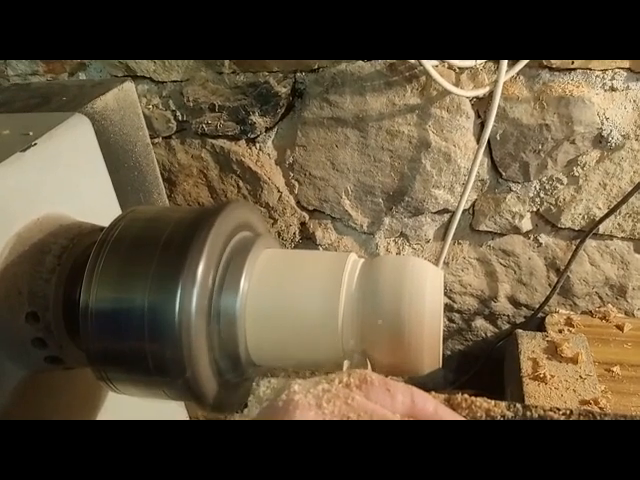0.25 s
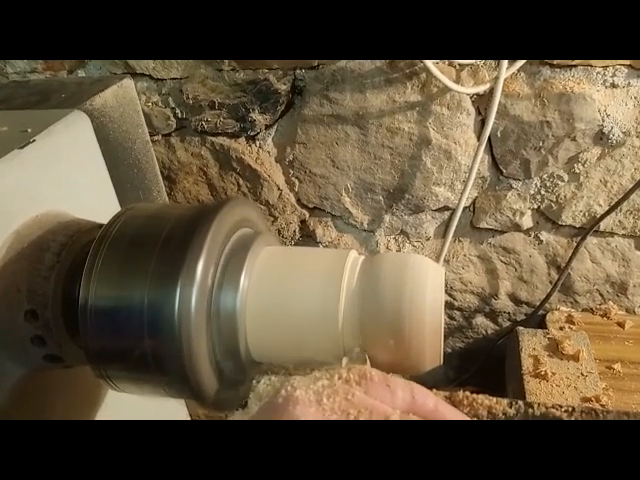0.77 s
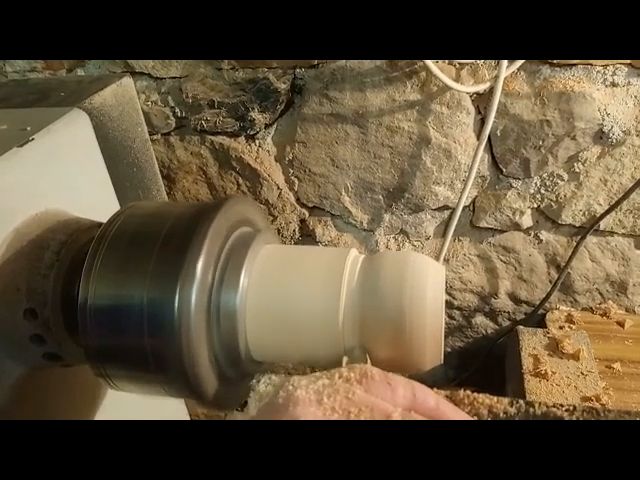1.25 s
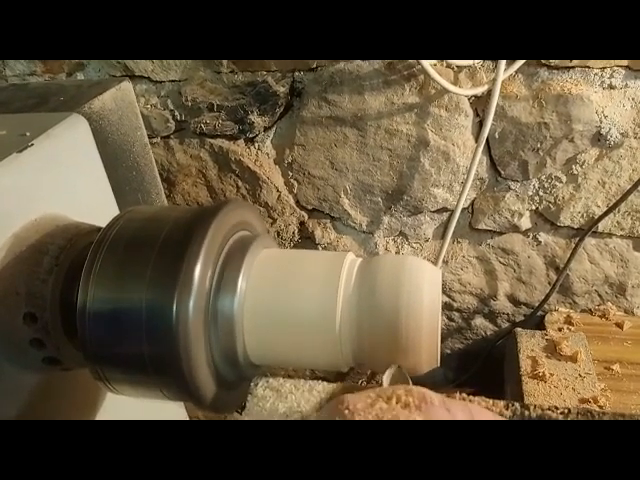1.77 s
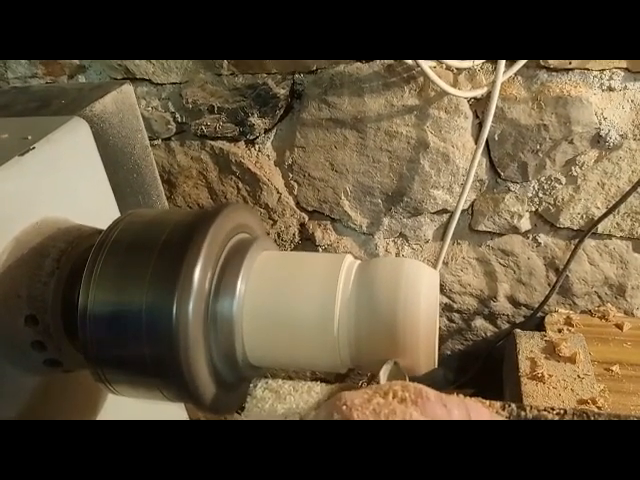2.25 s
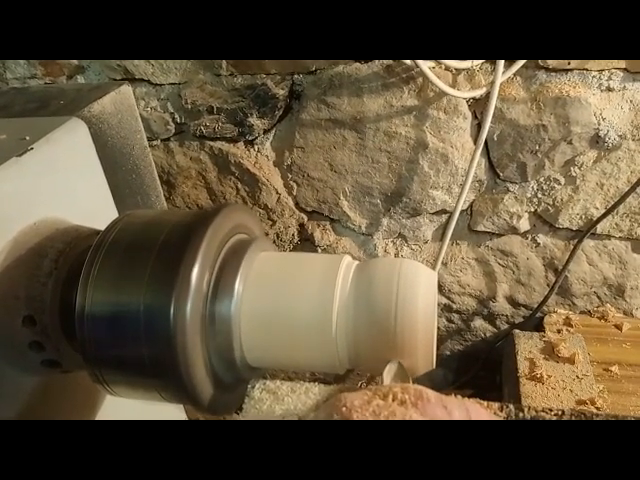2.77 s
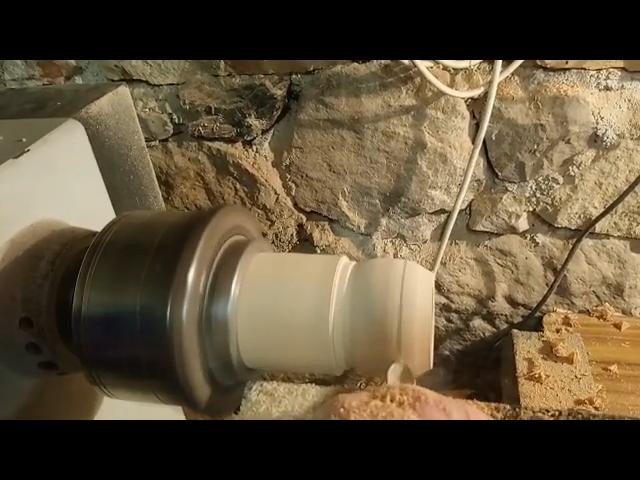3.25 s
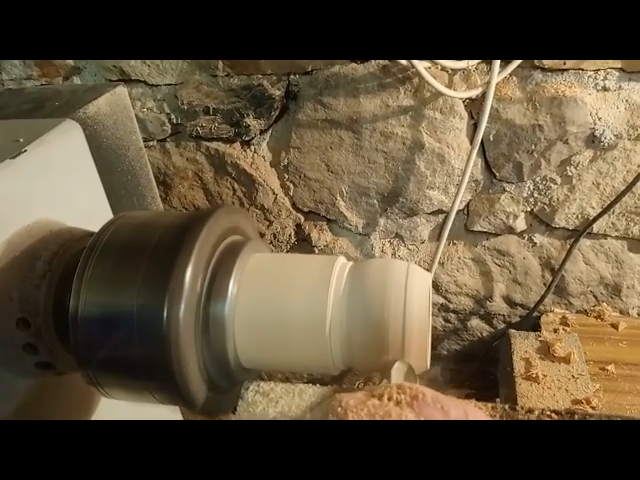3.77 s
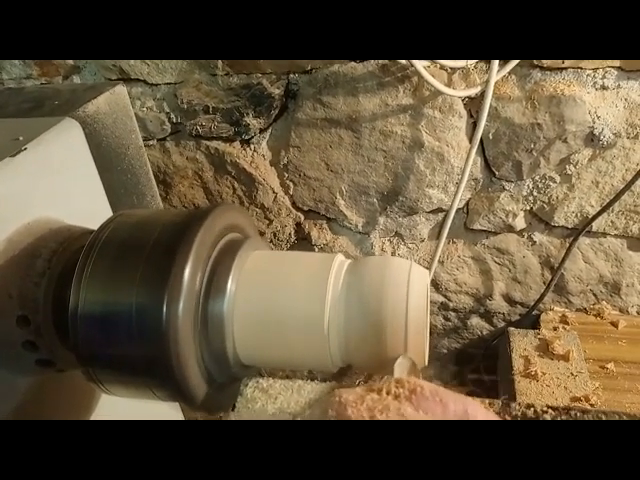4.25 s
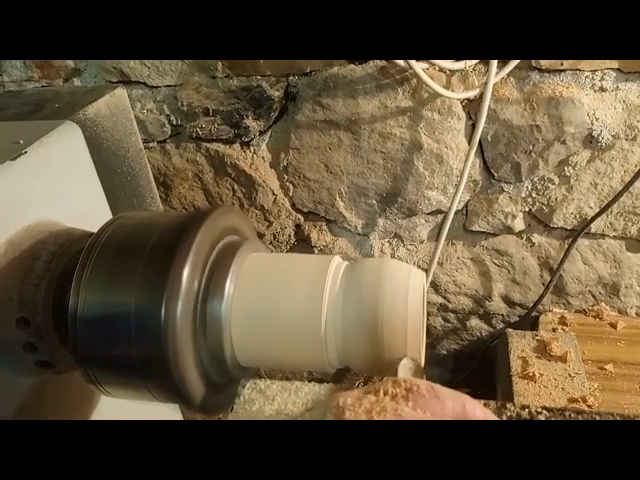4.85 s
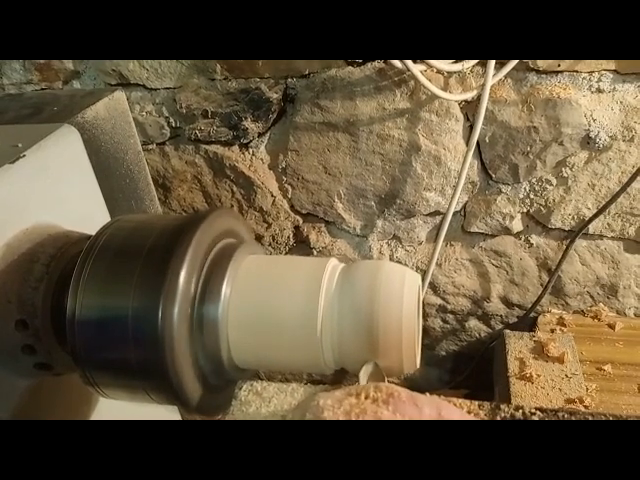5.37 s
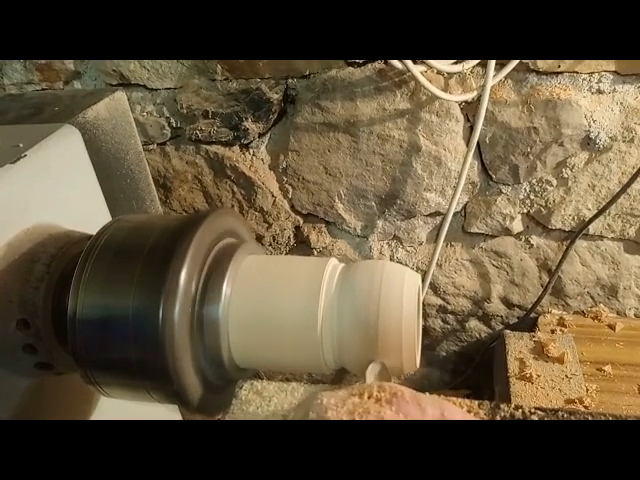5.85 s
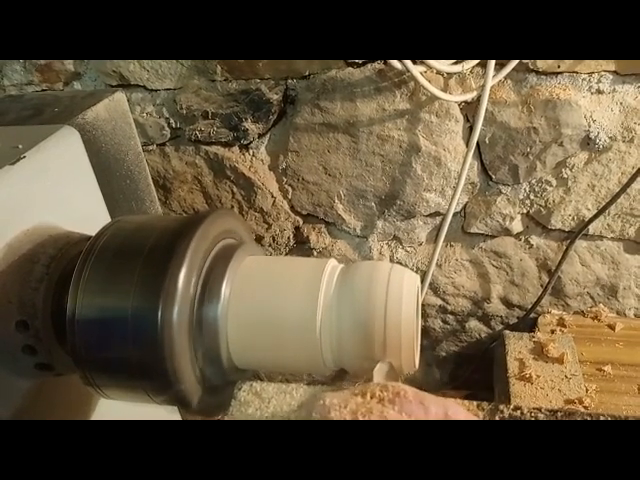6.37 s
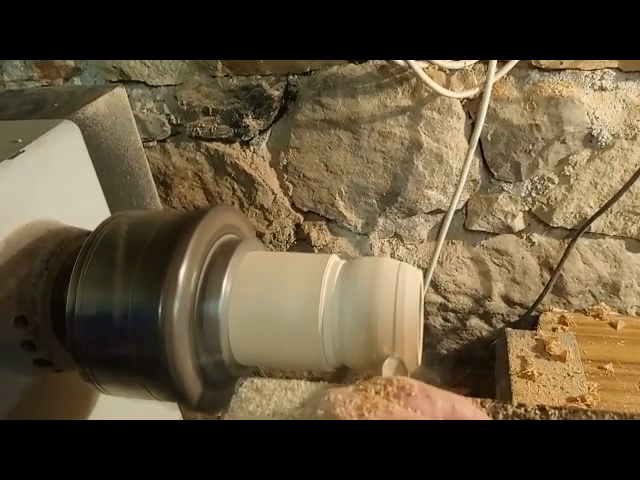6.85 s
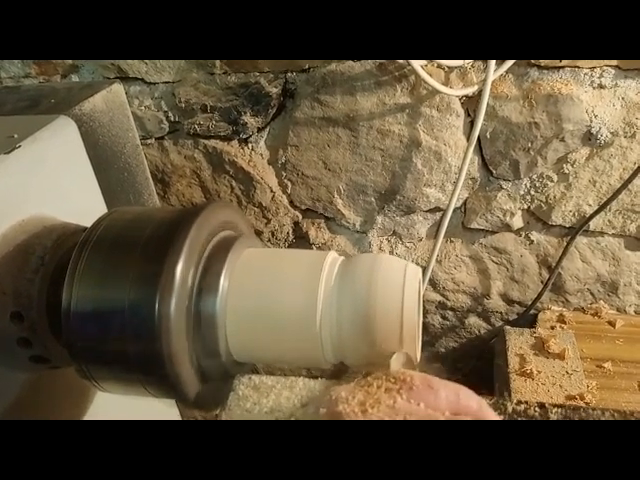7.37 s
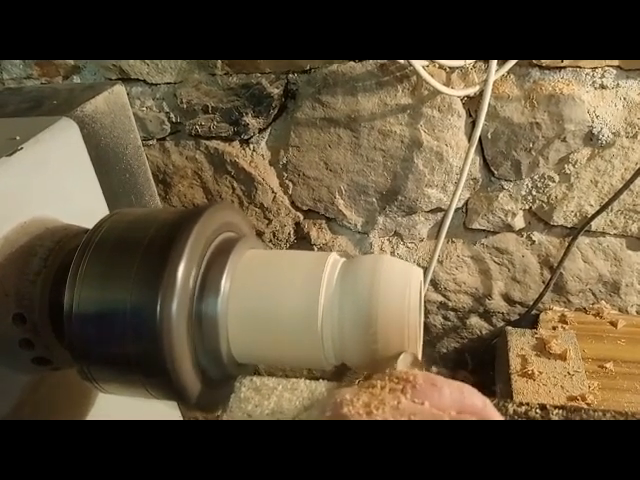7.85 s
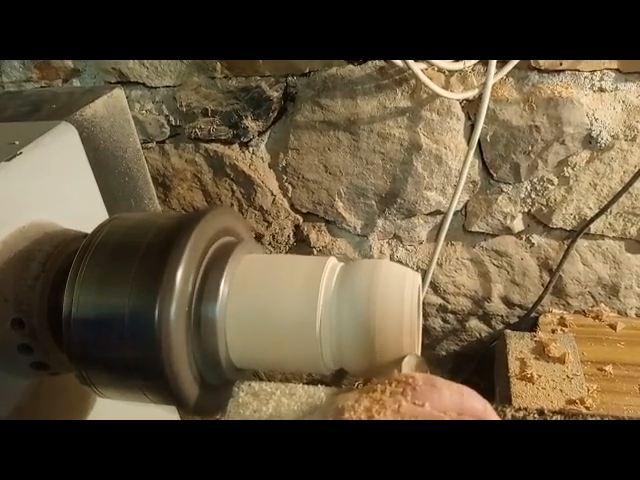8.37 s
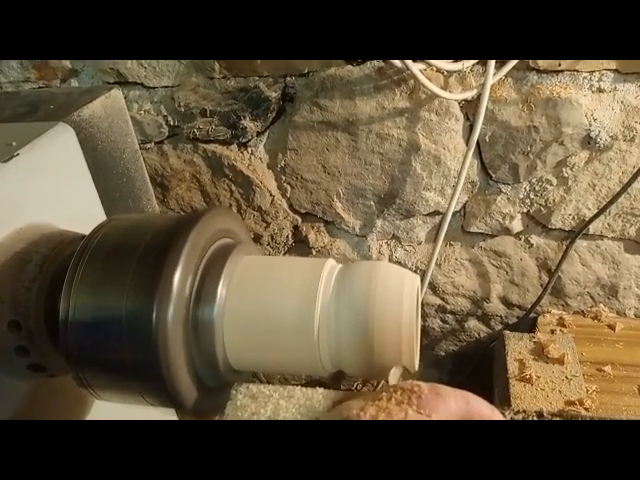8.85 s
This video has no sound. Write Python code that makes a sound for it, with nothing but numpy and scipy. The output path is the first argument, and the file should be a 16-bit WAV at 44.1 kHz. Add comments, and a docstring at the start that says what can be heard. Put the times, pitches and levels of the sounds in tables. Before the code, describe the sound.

A belt-driven wood lathe runs throughout, heard close in a small workshop, with a steady motor hum, a whirr and a low belt flutter. From the start a hand-held gouge is cutting the spinning wood with rapid hollow knocks, scraping and a hiss of shavings, lifting at about 1 second. Near 2 seconds it bites again, pulsing at first, then settling into a bright, hissing rasp with ringing steel chatter, small pings and a low throb, until about 4.4 seconds. The lathe runs alone briefly. A longer cut starts near 5 seconds with the same rasp and hiss. From about 7 seconds the hiss thins and the rasp falls in pitch, with brief squeaks and pings around 8 seconds before the tool lifts. The machine hums on, and just after 9 seconds the gouge lightly touches the wood again.

```python
"""A wood lathe runs in a small stone workshop, its belt bumping every lap and drumming on the frame.
A hand-held gouge (a curved chisel) is already knocking over ridges in a cove, a groove in the spinning
wood: tearing fibres scrape, ring the steel and hiss off as shavings. Near 2 s and 5 s it moves in on the
rim, catching the high side once a turn before it bites. Near 7 s it rolls onto the end face, squeaks
and lifts away. It is just touching down again at the end."""
import sys
import numpy as np
from scipy import signal
from scipy.fft import rfft, irfft, next_fast_len
from scipy.io import wavfile
from scipy.ndimage import uniform_filter1d

SR = 44100
rng = np.random.default_rng(int(sys.argv[2]) if len(sys.argv) > 2 else 0)


def transcribe(u):
    """Save the signal u as a 16-bit wav file named by the first command-line argument.

    u: samples, shape (n,) or (channels, n), limited to [-1, 1]; the rate is SR.
    q: integer samples, one column per channel.
    """
    v = np.clip(np.atleast_2d(u).T, -1, 1)
    q = np.round(v * 32767).astype(np.int16)
    wavfile.write(sys.argv[1], SR, q)


N = 401751
TIME = np.arange(N) / SR

# the belt's flutter, drumming and flap: (multiple of the lap rate, level [dB])
BELT_FLUTTER = [(8, -5), (9, -7), (11, -5), (12, -4.5), (14, -20), (15, -1), (16, -8.5), (18, -3.5)]
BELT_DRUM = [(22, -17), (23, 6), (24, 1), (25, 0), (26, -6)]
BELT_FLAP = [(31, -2), (37, -5), (38, -11), (43, -0.5), (45, 1), (46, 1.5), (48, -13), (50, -9.5), (55, 0)]
# the low rumble, and the whirr of belt, bearings and fan: (frequency [Hz], level [dB])
RUMBLE = [(20, -13), (55, -21), (90, -1), (125, -3.5), (200, -7), (300, -2.5), (450, -48)]
WHIRR = [(180, -39), (300, -14.5), (411, -4), (446, -2), (500, -1), (794, -15), (1050, -10), (1780, -11.5),
         (2140, -10), (2610, -16), (4880, -21), (7500, -32), (8990, -35), (9930, -45), (15500, -69)]
# how alike the machine's noise is in both ears: (frequency [Hz], likeness [-1 to 1])
EAR_LIKENESS = [(30, 0.68), (100, 0.89), (250, 0.97), (450, 0.52), (800, 0.063), (1300, -0.13),
                (15000, 0.031)]
# the note of the lathe's frame: (pitch [Hz], width [Hz], level [dB])
FRAME_NOTE = [(253.2, 30, 0)]
# the frame booms under the cut: (middle [s], length [s], boost [dB])
FRAME_BOOMS = [(.12, 0.33, 4), (.8, 0.61, 6.5), (2.82, 0.7, 2.5), (3.33, 0.35, 5), (3.82, 0.46, 4),
               (6.0, 1.5, 0.5), (7.33, 0.64, 6)]
# the motor's hum and the whine of its drive: (pitch [Hz], level [dB])
MOTOR_HUM = [(592.2, -14.5), (790, -29), (937, -27.5), (1071, -19), (1281, -24), (1437, -15.5)]
DRIVE_WHINE = [(8716, -63), (8909, -71)]
# passes of the gouge: (first touch [s], easing off [s], clear of the wood [s], high side [turns],
# swing once a turn [dB], scrape [dB], ring [dB], hiss [dB], hiss fade [dB/s], wood unevenness [dB],
# load on the motor [0-1], first bounce [turns], bounce depth [dB])
PASSES = [(-.5, 0.863, 0.96, 1, 0.3, -23, -2, 5, 7.5, 1, 0.4, 0, 2),
          (1.918, 4.197, 4.405, 0.064, -0.5, -23, 1.7, 1.5, 0.1, 1, 0.92, 0.14, 3.3),
          (4.943, 7.91, 8.263, 0.061, -0.5, -23.5, 3.5, 3, -0.15, 0.7, 1, 0.14, 3.5),
          (9.085, 9.499, 9.53, 0.47, -2.5, -28, 8, 7, 4, 5, .3, 0.14, 2)]
# ridges in the cove that strike the edge every turn:
# (angle [turns], half width [turns], knock [dB], scrape [dB], ring [dB], hiss [dB])
COVE_RIDGES = [(.03, .02, 4, 2, 2, 5), (.122, .018, 4, 9, 2, 1), (.192, .016, 0, 7, 0, 3),
               (.28, .025, 2, 5, 3, -3), (.425, .02, 6, 2, -2, 0), (.585, .035, 4, 5, 6, 6),
               (.718, .018, 3, 9, -1, 1), (.78, .025, 3, 4, 6, 1), (.89, .055, 12, 2, 5, 1)]
# tone of the hollow knock and the scrape in the cove: (frequency [Hz], level [dB])
COVE_KNOCK = [(600, -24), (950, -16), (1120, -8.5), (1300, -9.5), (1410, 8.5), (1520, -7.5), (1750, -15),
              (2200, -40.5)]
COVE_SCRAPE = [(900, -35), (1400, -18), (1750, -10.5), (2150, 4.5), (2450, 4), (2850, -5.5), (3150, -12),
               (3500, -11), (4500, -40.5)]
# tone of the hiss in the cove, on the rim and on the end face, each with a narrow gap near 11 kHz
# that is not from the shavings: (frequency [Hz], level [dB])
COVE_HISS = [(2350, -58), (3900, 7), (4210, 7), (4500, 8.5), (5200, 7.5), (5650, -8), (6480, -9),
             (6890, -12.5), (8550, -23), (11000, -42), (12200, -20.5), (14000, -55)]
RIM_HISS = [(2410, -27), (3100, -23.5), (4100, 8.5), (4330, -1), (4620, 3.5), (5150, -4), (5750, -5.5),
            (6100, -10), (6700, -9.5), (7230, -5.5), (7520, -15), (7780, -24), (8300, -18), (9880, -29.5),
            (11100, -54), (12500, -22), (13800, -42), (15000, -31), (15500, -47)]
FACE_HISS = [(2410, -27), (4100, 5.5), (5010, -4.5), (5450, 3), (6260, -11), (6920, -6), (7730, -13),
             (9880, -23), (11200, -52), (12300, -17), (15000, -42)]
# the main and the faint upper notes of the bending steel: (pitch [Hz], width [Hz], level [dB])
STEEL_NOTES = [(3751, 193, 3), (3918, 160, 4)]
STEEL_UPPER_NOTES = [(4850, 130, 5), (5550, 270, 4), (6170, 300, 1.5)]
# rasp of the bevel, the slope behind the edge: (time [s], pitch [Hz], level [dB])
BEVEL_RASP = [(2.45, 3350, -27), (2.65, 3380, -5.5), (3.7, 3420, -8), (4.05, 3370, -5), (4.4, 3340, -17),
              (5.85, 3440, -4), (7.0, 3320, 1.5), (7.15, 2970, -7), (7.25, 2440, -3), (7.4, 2290, 2),
              (7.9, 2200, -10)]
# the wood buzzes in the cove and on the rim: (multiple of the spin rate, level [dB])
COVE_BUZZ = [(26, 0.5), (30, -5.5), (34, -4), (47, -7.5)]
RIM_BUZZ = [(33, -7), (39, -2.5), (47, -4), (65, -1.5), (68, 0.5), (75, -8), (77, -3), (85, 4)]
# notes of the tool rest and the frame under it: (pitch [Hz], width [Hz], level [dB])
REST_NOTES = [(461.5, 38, 1.5), (269.5, 27, -1), (671, 50, -8)]
# where the cut is heard, in the cove and on the rim: (frequency [Hz], left minus right [dB])
COVE_BALANCE = [(1150, 2), (1450, 6.5), (1900, -2.5), (2600, 12.5), (4000, 1), (6400, 2.5), (9800, -15),
                (12000, -5)]
RIM_BALANCE = [(1150, 0.5), (1450, 6), (2050, 1), (2500, 9), (3600, 2), (5000, 2.5), (7200, -11.5),
               (9000, -4.5), (9900, -20), (12000, -6)]
# tone of the scrape on the rim: (frequency [Hz], level [dB])
RIM_SCRAPE = [(600, -33), (980, -22.5), (1120, -13.5), (1400, -3), (1700, -10), (2150, 2.5), (2550, -3.5),
              (3030, -14), (3400, -3.5), (3700, -3.5), (4500, -39)]
# tone of the dust spray, with the same gap near 11 kHz, not from the dust: (frequency [Hz], level [dB])
DUST_SPRAY = [(6500, -32), (8400, 10), (10000, 4), (11200, -25), (12600, 4), (15600, 0)]
# hollow notes of the clamped wood: (pitch [Hz], width [Hz], level [dB])
WOOD_NOTES = [(1414.6, 53, 5), (2190, 81, -1)]
# deeper bites hiss, the steel chatters, the tool rest throbs: (middle [s], length [s], boost [dB])
DEEP_BITES = [(2.15, .32, 4), (2.62, .32, 2.5), (2.93, 0.39, 3), (3.27, .35, 2), (5.16, 0.45, 3),
              (5.6, 0.51, 1)]
CHATTERS = [(2.37, 0.36, 3.5), (3.58, 0.86, 3.5), (4.1, 0.54, 3.5), (6.85, 0.5, 1.5), (8.18, 0.15, 1)]
REST_THROBS = [(2.72, 1, 6.5), (3.43, .32, 7.5), (3.92, 0.59, 5.5), (5.66, 0.64, 7), (6.2, .45, 4.5),
               (6.65, 0.63, 7), (7.67, 0.26, 6)]
# the edge catches on hard fibres and the steel pings: (time [s], change in ring [dB])
CATCHES = [(2.33, 8), (2.362, 13), (2.421, 10), (3.08, 7), (3.78, 1), (3.977, 8), (4.14, 7), (8.09, 8),
           (8.149, 8), (8.179, 10), (8.241, -2)]
# the bevel squeaks on the end face: (middle [s], length [s], pitch [Hz], glide [Hz/s], level [dB])
SQUEAKS = [(7.726, 0.27, 4280, 697, -4), (7.923, 0.26, 3360, -1500, 1.5), (8.14, 0.046, 3110, -6000, 3)]

SPIN_HZ, BELT_HZ = 16.77, 11.04  # turns of the wood and laps of the belt each second
FIRST_SHARE, BITE_S = 0.49, 0.25  # the edge touches for part of a turn at first, then for all of it
OFF_CENTRE_DB, TRUING_S = 3.5, 0.26  # extra swing once a turn, and how fast it is cut away
LOW_SIDE_DB, LOW_SIDE_S = -15, 0.12  # the wood's low side leaves a gap that soon closes
PEEL_S, PEEL_RISE_S = 0.5, 0.11  # the hiss is weaker until a shaving peels off steadily
FACE_S, ROLL_S = 7.08, 0.093  # when and how fast the gouge rolls onto the end face
BOUNCES = 4  # times a turn that the steel bounces on the bumps it has cut
CHIPS_PER_S, CHIP_S, CHIP_DB = 260, 0.0064, 1.5  # rate, fade time and depth of the chips


def gain_of(db):
    """Turns decibels into a number to multiply by."""
    return 10 ** (np.asarray(db) / 20)


def evened(x):
    """Scales x to an average (rms) level of one."""
    return x / np.sqrt(np.mean(x ** 2) + 1e-20)


def steadied(x, limit, size):
    """Softens the loud moments of x, judged over size samples; a lower limit softens more."""
    power = abs(uniform_filter1d(evened(x) ** 2, size=size))
    return evened(x / np.sqrt(1 + 2 * power / limit ** 2))


def ramp(since, length):
    """Rises from 0 to 1 over the given length."""
    return np.clip(since / length, 0, 1)


def arch(middle, length):
    """A smooth swell from 0 to 1 and back."""
    return np.cos(np.pi * np.clip((TIME - middle) / length, -.5, .5)) ** 2


def swells(rows):
    """The decibels added by a table of swells."""
    return sum(db * arch(middle, length) for middle, length, db in rows)


def drift(per_s):
    """A random wander that picks a new value per_s times a second."""
    knots = rng.standard_normal(256)
    return np.interp(TIME * per_s, np.arange(len(knots)), knots, period=len(knots))


def read(points, hz):
    """Looks up a table by frequency, sliding smoothly between its rows."""
    row_hz, value = np.transpose(points)
    return np.interp(np.log(hz + 1), np.log(row_hz + 1), value)


def shaped(x, gain):
    """Turns each frequency of x up or down by gain(hz)."""
    size = next_fast_len(N + 4096)
    return irfft(rfft(x, size) * gain(np.fft.rfftfreq(size, 1 / SR)), size)[..., :N]


def coloured(x, spectrum):
    """Gives x the tone listed in a table, at level one."""
    return evened(shaped(x, lambda hz: gain_of(read(spectrum, hz))))


def ringing(x, notes):
    """Lets x ring an object's notes; each filter runs twice to make it steep."""
    out = 0
    for hz, width, db in notes:
        b, a = signal.iirpeak(hz, hz / width, SR)
        out = out + gain_of(db) * signal.lfilter(b, a, signal.lfilter(b, a, x))
    return evened(out)


def gliding(x, hz, width):
    """Lets x ring one note whose pitch follows the curve hz."""
    turn = np.exp(2j * np.pi * np.cumsum(hz) / SR)
    keep = np.exp(-np.pi * width / SR)
    return evened((turn * signal.lfilter([1], [1, -2 * keep, keep * keep], x / turn)).real)


def revolving(hz, memory, size):
    """A random pattern of size points a turn; memory sets how much lasts into the next turn."""
    keep = np.clip(memory, 0, .98)
    fresh = rng.standard_normal((int(N / SR * hz) + 2, size))
    before = keep * rng.standard_normal((1, size))
    turns = signal.lfilter([np.sqrt(1 - keep ** 2)], [1, -keep], fresh, axis=0, zi=before)[0]
    return np.interp(TIME * hz * size, np.arange(turns.size), turns.ravel())


def overtones(lap_hz, orders, waver):
    """Overtones of something that goes round, each swelling and fading."""
    laps = lap_hz * TIME + 0.01373 * drift(3.3)
    out = 0
    for multiple, db in orders:
        strength = gain_of(db) * (1 + waver * drift(5.5))
        out = out + strength * np.cos(2 * np.pi * (multiple * laps + rng.random()))
    return evened(out)


def two_ears(paths, direct):
    """The first path reaches both ears directly; the other two are scattered, one to each ear."""
    straight = np.array([np.roll(paths[0], 15), paths[0]])  # the right ear is nearer
    return evened(direct * straight + paths[1:])


def belt_noise(memory):
    """Noise that partly repeats with every lap of the belt; the bass is much alike in both ears."""
    one, other = (revolving(BELT_HZ, memory, size=8000) for _ in range(2))
    mid = shaped(one, lambda hz: np.sqrt(np.clip(1 + read(EAR_LIKENESS, hz), 0, 2)))
    side = shaped(other, lambda hz: np.sqrt(np.clip(1 - read(EAR_LIKENESS, hz), 0, 2)))
    return np.array([mid + side, mid - side])


def motor(tones, wobble, per_s):
    """The motor's tones waver in pitch and strength; high ones reach the ears out of step."""
    out = np.zeros((2, N))
    for hz, db in tones:
        lag = np.array([[0], [min(hz / 5000, .2)]])
        turns = hz * TIME + wobble * drift(per_s) + rng.random() + lag
        out += gain_of(db) * np.sqrt(2) * (1 + 0.41 * drift(15)) * np.cos(2 * np.pi * turns)
    return out


def lathe(load):
    """The belt flutters and drums on the frame, the bearings whirr and the motor hums."""
    duck_db = -12 * load  # the belt's low flutter and rumble get quieter while the gouge cuts
    beat_db = 1.6 * np.cos(2 * np.pi * 1.99 * (TIME - 3.37))  # a slow pulse under load
    drum_db = -34 + (beat_db - 4.5) * load + swells(FRAME_BOOMS)
    whirr_db = -35.5 + (1.4 * drift(6.9) - 4) * load
    flutter = gain_of(-3.5) * overtones(BELT_HZ, BELT_FLUTTER, waver=0.54)
    rumble = gain_of(-4.5) * coloured(belt_noise(memory=0.52), RUMBLE)
    drum = gain_of(-3) * overtones(BELT_HZ, BELT_DRUM, waver=0.3)
    frame = gain_of(-5.5) * ringing(belt_noise(memory=0.3), FRAME_NOTE)
    whirr = gain_of(1.52) * coloured(belt_noise(memory=0.74), WHIRR)
    flap = gain_of(-5.5) * overtones(BELT_HZ, BELT_FLAP, waver=0.59)
    hum = motor(MOTOR_HUM, wobble=0.22, per_s=6)
    free = gain_of(duck_db / 2)  # flap and hum are clearest while the wood spins freely
    return (gain_of(-42 + duck_db) * (flutter + rumble)
            + gain_of(drum_db + [[-.5], [.5]]) * (drum + frame)
            + gain_of(whirr_db) * (whirr + free * (flap + hum))
            + motor(DRIVE_WHINE, wobble=.12, per_s=16))


def gouge():
    """The hand bites in, cuts, eases off and lifts. Gives the curves that steer the other sounds."""
    rows = np.array(PASSES)
    current = np.maximum(np.searchsorted(rows[:, 0], TIME) - 1, 0)
    (start, ease, end, high_side, swing_db, scrape_db, ring_db, hiss_db, fade_db_per_s,
     uneven_db, load, bounce_turns, bounce_db) = rows[current].T
    age = TIME - start
    bite, eased, held = ramp(age, BITE_S), ramp(TIME - ease, end - ease), ramp(end - TIME, 0.032)
    in_cove, on_face = current == 0, ramp(TIME - FACE_S, ROLL_S)
    angle = (SPIN_HZ * TIME - high_side + .5) % 1 - .5  # turns away from the high side
    touching = 2 * abs(angle) <= FIRST_SHARE + (1 - FIRST_SHARE) * bite ** 1.25
    throb_db = (swing_db + OFF_CENTRE_DB * np.exp(-age / TRUING_S)) * np.cos(2 * np.pi * angle)
    gap_db = LOW_SIDE_DB * np.exp(-age / LOW_SIDE_S) * ramp(abs(angle) - .3, 0.17)
    press_db = -4.5 * (1 - bite) - 4 * eased + on_face
    force = touching * held * gain_of(scrape_db + throb_db + gap_db + press_db)
    # the steel rings more freely while the edge presses lightly
    ring_db = ring_db + swells(CHATTERS) + 2.5 * (1 - bite + eased) - 2 * on_face
    unpeeled = 1 - ramp(age - PEEL_S, PEEL_RISE_S)
    peeling_db = -5 * unpeeled - fade_db_per_s * np.maximum(age - PEEL_S, 0)
    # on the rim the shaving is thickest just after the high side, so the hiss comes in puffs
    puff_db = (1 + 1.6 * unpeeled) * ~in_cove * (1 - on_face) * np.cos(2 * np.pi * (angle - 0.16))
    thinning_db = -10.5 * eased - 7.5 * on_face
    hiss_db = hiss_db + swells(DEEP_BITES) + peeling_db + puff_db + thinning_db
    load = load * ramp(age, 0.47) * (1 - eased) * (1 - 0.5 * on_face)  # builds as the cut deepens
    return dict(force=uniform_filter1d(force, size=190), load=uniform_filter1d(load, int(0.067 * SR)),
                age=age, in_cove=in_cove, on_face=on_face, uneven_db=uneven_db,
                bounce_turns=bounce_turns, bounce_db=bounce_db, ring_db=ring_db, hiss_db=hiss_db)


def wood_grain():
    """How hard the wood is under the edge: growth rings at uneven places come round every turn."""
    rings = revolving(SPIN_HZ, memory=0.98, size=36)
    return evened(np.tanh(rings - uniform_filter1d(rings, size=2000)))


def ridges(in_cove):
    """Ridges in the cove strike the edge. Gives a gain each for knock, scrape, ring and hiss."""
    angle, half_width, *extra_db = np.transpose(COVE_RIDGES)
    around = np.linspace(0, 1, 400)
    distance = (around - angle[:, None] + .5) % 1 - .5
    bumps = np.exp(-(distance / half_width[:, None]) ** 2)
    depth = in_cove * (0.64 + 0.36 * ramp(TIME - 0.37, 0.22))  # the ridges deepen early on
    return [gain_of(depth * np.interp(SPIN_HZ * TIME % 1, around, db - db.mean()))
            for db in np.array(extra_db) @ bumps]


def fibres(per_s, spread_db, rub, direct):
    """Tearing fibres snap at random over the smooth rub of the bevel."""
    strength = gain_of(spread_db * np.minimum(rng.exponential(1, N), 4))
    snaps = evened(strength * (rng.random(N) < per_s / SR))
    return two_ears(snaps * rng.choice([-1, 1], (3, N)) + rub * rng.standard_normal((3, N)), direct)


def scrape(snaps, marks, hardness, knock_ridge, scrape_ridge, hand):
    """The edge shudders over the wood: knocking in the cove, ringing its hollow notes elsewhere."""
    repeating = 0.25 + 0.27 * hand["in_cove"] + 0.29 * hand["on_face"]
    shudder = hardness * (np.sqrt(1 - repeating) * snaps + np.sqrt(repeating / 2) * marks)
    # the cove guides the edge, so every turn strikes about equally hard
    knock = gain_of(-6.5) * knock_ridge * steadied(coloured(shudder, COVE_KNOCK), limit=1, size=200)
    cove = gain_of(-2.5) * scrape_ridge * steadied(coloured(shudder, COVE_SCRAPE), limit=1, size=80)
    rim = gain_of(-1) * coloured(shudder, RIM_SCRAPE)
    hollow = gain_of(-11.5) * ringing(hardness * (snaps[::-1] + 0.29 * marks), WOOD_NOTES)
    return np.where(hand["in_cove"], knock + cove, rim + hollow)


def shavings(tear, hiss_ridge, hand):
    """Shavings hiss off the edge in the cove, on the rim and on the end face."""
    cove = hiss_ridge * steadied(coloured(tear + 0.2 * tear[::-1], COVE_HISS), limit=1, size=80)
    rim = (1 - hand["on_face"]) * coloured(tear, RIM_HISS)
    face = hand["on_face"] * coloured(tear, FACE_HISS)
    return gain_of(hand["hiss_db"] - 1.5) * np.where(hand["in_cove"], cove, rim + face)


def steel(drive, hand):
    """The gouge rings in bursts as it bounces and catches, at a pitch that shifts with grip and load."""
    angle = SPIN_HZ * TIME - hand["bounce_turns"] + 0.032 * hand["on_face"]  # earlier on the end face
    bounce_db = hand["bounce_db"] * np.cos(2 * np.pi * BOUNCES * angle)
    bounce_db -= 0.5 * ~hand["in_cove"] * np.cos(2 * np.pi * (angle - 1 / BOUNCES))  # softer 2nd bounce
    stutter_db = 0.6 * swells(CHATTERS) * np.cos(2 * np.pi * 9 * (SPIN_HZ * TIME - .06))  # nine a turn
    catch_db = swells([(s, .014, db) for s, db in CATCHES])
    swing_db = catch_db + (bounce_db + stutter_db) * np.exp(-abs(catch_db) / 2)  # a catch interrupts
    bend_hz = 48.6 * drift(45) + 20 * hand["load"]
    ring = sum(gain_of(db) * gliding(sign * drive, hz + bend_hz, width)
               for (hz, width, db), sign in zip(STEEL_NOTES, (1, -1)))
    gripped = steadied(ring, limit=1.9, size=24)  # the grip keeps the steel from swinging far
    bursts = steadied(gripped * gain_of(swing_db), limit=6.7, size=24)
    keep = np.exp(-1 / (0.0019 * SR))  # it rings on briefly after the edge leaves the wood
    return gain_of(hand["ring_db"] - 2) * signal.lfilter([1 - keep], [1, -keep], hand["force"]) * bursts


def bevel(hardness):
    """The bevel rubs behind the edge: a rasp that falls as the gouge rolls round, then squeaks."""
    times, pitches, levels = np.transpose(BEVEL_RASP)
    hz, db = np.interp(TIME, times, pitches), np.interp(TIME, times, levels)
    rub = hardness * rng.standard_normal((2, N))
    waver_hz = 70 * drift(25)
    rasp = gain_of(db) * gliding(rub, hz + waver_hz, width=460)
    for middle, length, squeak_hz, glide, squeak_db in SQUEAKS:
        pitch = squeak_hz + glide * np.clip(TIME - middle, -length, length)
        rasp += gain_of(squeak_db) * arch(middle, length) * gliding(rub, pitch + waver_hz, width=260)
    return rasp


def wood_buzz(in_cove):
    """The wood buzzes at multiples of its spin rate. Gives the buzz outside the cove, then inside."""
    rim = np.array([overtones(SPIN_HZ, RIM_BUZZ, waver=0.68) for _ in range(2)])
    cove = overtones(SPIN_HZ, COVE_BUZZ, waver=0.38)
    return ~in_cove * gain_of(-17) * rim, in_cove * gain_of(-18) * cove


def tool_rest(marks, in_cove):
    """The cut shakes the bar that the gouge leans on, which sounds from the right."""
    level_db = -21 + 3.5 * in_cove + swells(REST_THROBS) + np.array([[-2.75], [2.75]])
    return gain_of(level_db) * steadied(ringing(marks.mean(axis=0), REST_NOTES), limit=1, size=4000)


def cut(hand):
    """The grain sets how strongly fibres tear. Gives the sound at the edge and the low shaking."""
    force, in_cove = hand["force"], hand["in_cove"]
    grain_db = hand["uneven_db"] * wood_grain()
    knock_ridge, scrape_ridge, ring_ridge, hiss_ridge = ridges(in_cove)
    clumps = gain_of(0.4 * drift(18) + CHIP_DB * chips() * ~in_cove)
    hardness = np.minimum(clumps * gain_of(grain_db), 2)
    snaps = fibres(per_s=9000, spread_db=1.0, rub=1.04, direct=0.82)
    # the edge rides the marks it left a turn ago, so much of the shudder repeats
    marks = two_ears(np.array([revolving(SPIN_HZ, memory=0.9, size=2000) for _ in range(3)]), direct=.8)
    tear = snaps * clumps * gain_of(0.32 * grain_db)
    ring = ring_ridge * steel((snaps + 0.23 * marks) * clumps * gain_of(0.12 * grain_db), hand)
    upper_ring = gain_of(-19.5) * ringing(marks[::-1] * hardness, STEEL_UPPER_NOTES)
    rasp = gain_of(-3) * bevel(hardness)
    rim_buzz, cove_buzz = wood_buzz(in_cove)
    edge = scrape(snaps, marks, hardness, knock_ridge, scrape_ridge, hand)
    edge += shavings(tear, hiss_ridge, hand) + rasp + upper_ring + dust(tear, hand) + rim_buzz
    edge = np.sqrt(np.mean(edge ** 2)) * steadied(edge, limit=4.3, size=24)  # same level, softer peaks
    return force * edge + ring, force * (tool_rest(marks, in_cove) + cove_buzz)


def reflections(fade_s):
    """Scattered echoes, different at each ear, that fall by 60 dB in fade_s."""
    t = np.arange(SR // 2) / SR
    taps = rng.choice([-1, 1], (2, len(t))) * (rng.random((2, len(t))) < 4000 / SR) * (t > .001)
    taps = taps * gain_of(-60 * t / fade_s)
    return taps / np.linalg.norm(taps, axis=1, keepdims=True)


def workshop(x, in_cove):
    """The stone wall answers at once, the room faintly after; left and right depend on the spot cut."""
    echoes = gain_of(-7.5) * reflections(fade_s=0.065) + gain_of(-20) * reflections(fade_s=0.9)
    heard = x + signal.oaconvolve(x, echoes, axes=1)[:, :N]
    sides = np.array([[.5], [-.5]])
    cove = shaped(heard, lambda hz: gain_of(read(COVE_BALANCE, hz) * sides))
    rim = shaped(heard, lambda hz: gain_of(read(RIM_BALANCE, hz) * sides))
    return np.where(in_cove, cove, rim)


def chips():
    """The shaving breaks into chips: each snaps off at once and its pull dies away."""
    breaks = 1. * (rng.random(N) < CHIPS_PER_S / SR)
    pull = signal.lfilter([1], [1, -np.exp(-1 / (CHIP_S * SR))], breaks)
    return evened(np.tanh(.5 * evened(pull - pull.mean())))


def dust(tear, hand):
    """Fine dust sprays off the fresh surface at the start of each pass after the first."""
    return ~hand["in_cove"] * gain_of(-30.5) * np.exp(-hand["age"] / 0.41) * coloured(tear, DUST_SPRAY)


def scene():
    """The running lathe and the cut, in the workshop."""
    hand = gouge()
    edge, shaking = cut(hand)
    return lathe(hand["load"]) + workshop(edge, hand["in_cove"]) + shaking


def record(dry, top_hz=15650):
    """Takes away the very highest treble."""
    low_pass = signal.firwin(511, top_hz, window=("kaiser", 9), fs=SR)
    return signal.oaconvolve(dry, low_pass[None], "same")


dry = scene()
out = record(dry)
transcribe(out)
```